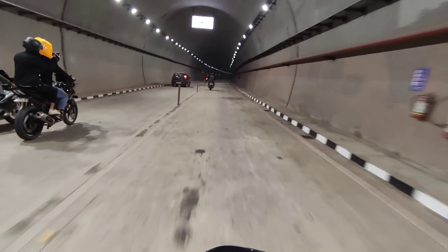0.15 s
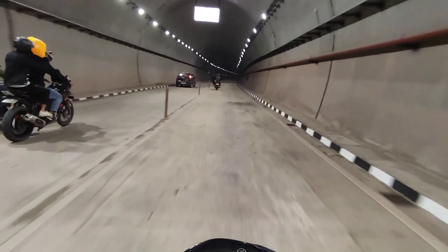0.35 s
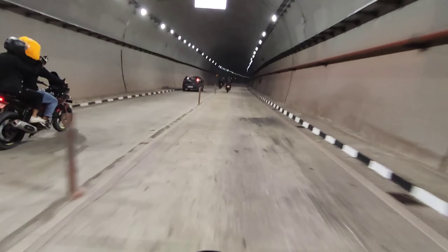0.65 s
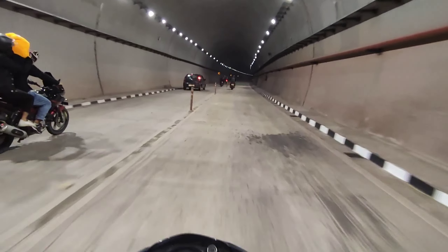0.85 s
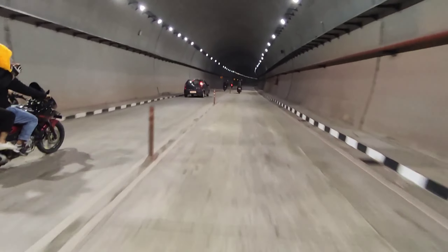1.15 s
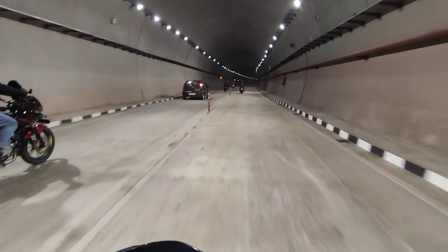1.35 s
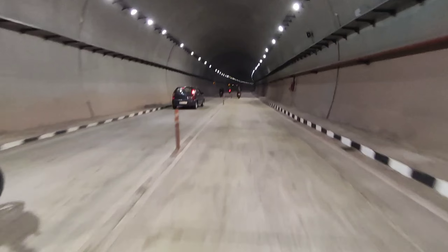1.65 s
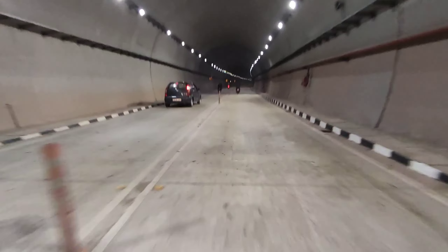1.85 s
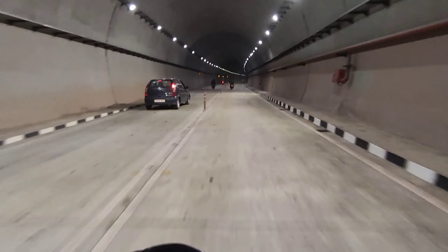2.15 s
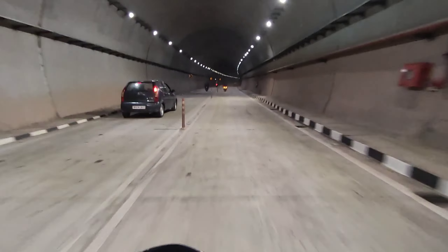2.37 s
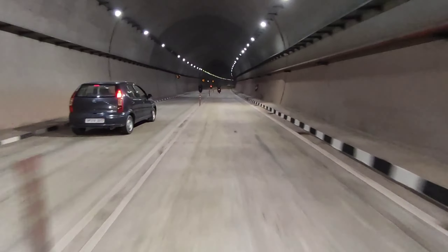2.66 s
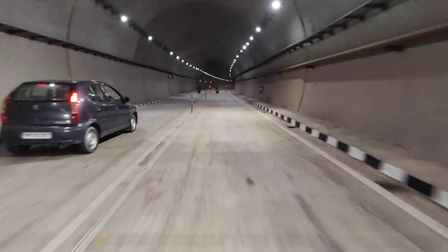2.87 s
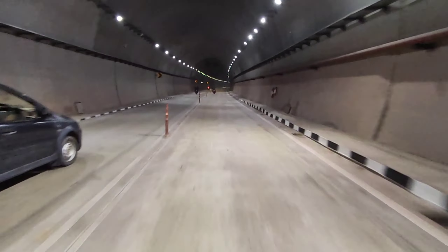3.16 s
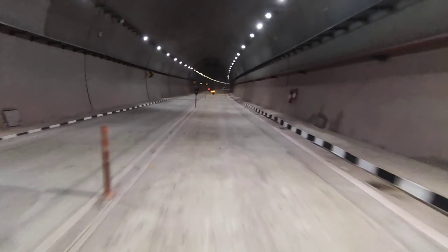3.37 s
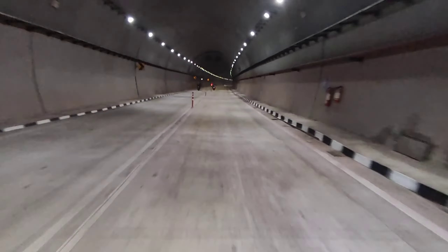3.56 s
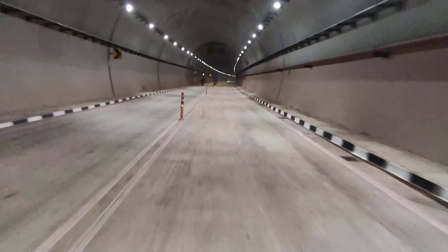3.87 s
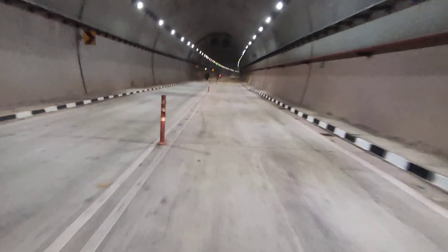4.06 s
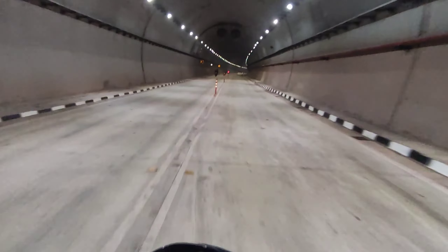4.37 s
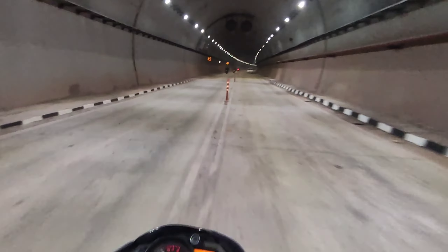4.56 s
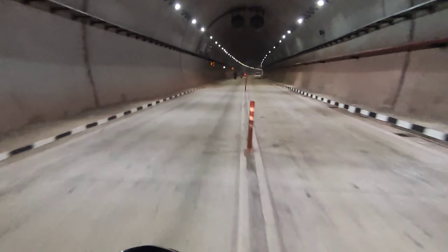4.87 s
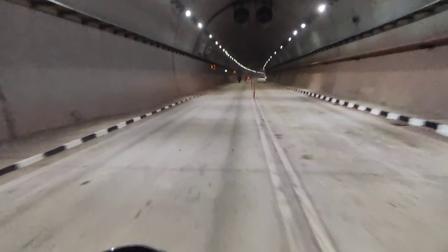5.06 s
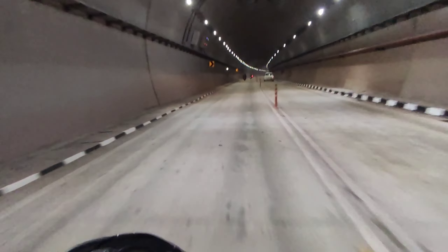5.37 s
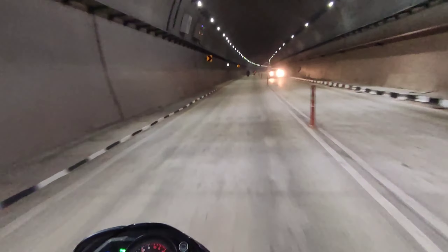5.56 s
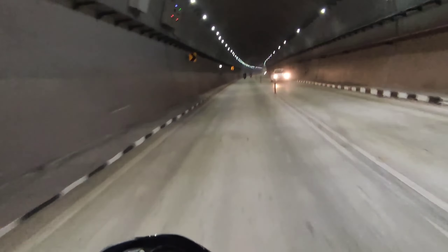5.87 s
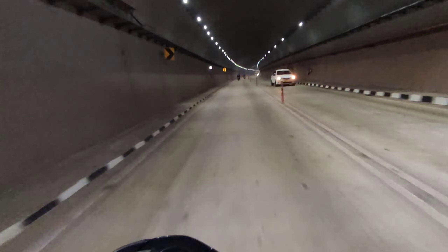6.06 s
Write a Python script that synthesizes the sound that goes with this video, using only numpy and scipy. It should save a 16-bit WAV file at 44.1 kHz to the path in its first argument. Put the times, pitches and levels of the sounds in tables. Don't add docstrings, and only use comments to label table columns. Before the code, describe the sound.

Onboard a motorcycle accelerating through a concrete road tunnel, raspy exhaust drone, sharp backfire pops, a gear change, roaring echoes and buffeting wind.

```python
import sys
import numpy as np
from scipy import signal
from scipy.fft import rfft, irfft, next_fast_len
from scipy.io import wavfile
from scipy.ndimage import uniform_filter1d, minimum_filter1d

SR = 44100
rng = np.random.default_rng(int(sys.argv[2]) if len(sys.argv) > 2 else 0)


def voltage_ratio(level):
    return 10 ** (np.asarray(level, float) / 20)


def wav_out(sig):
    wavfile.write(sys.argv[1], SR, np.round(np.clip(np.atleast_2d(sig).T, -1, 1) * 32767).astype(np.int16))


N = 274302

# t/s, peak level/dB
POP_TIMES = [
    (1.2216, -8.5),
    (1.303, -11.5),
    (1.373, -17),
    (1.3833, -22.5),
    (1.4465, -17),
    (1.5285, -11.5),
    (1.6084, -12.5),
    (5.823, -24.5),
]
DROPOUT_S = .4696


def rms_one(x):
    return x / np.sqrt(np.mean(x ** 2) + 1e-20)


def in_time(rows):
    s, *columns = np.transpose(rows)
    return [np.interp(np.arange(N) / SR, s, c) for c in columns]


def bump(s, half_s):
    return np.exp(-((np.arange(N) / SR - s) / half_s) ** 2)


def drift(rate_hz):
    coarse = 40
    r = np.exp(-2 * coarse * np.pi * rate_hz / SR)
    slow = signal.lfilter([1], [1, -2 * r, r * r], rng.standard_normal(N // coarse + 2002))[2000:]
    return np.interp(np.arange(N) / coarse, np.arange(len(slow)), rms_one(slow - slow.mean()))


def noise_bands(spectrum, patchy_db, patch_rate):
    hz, level_db = np.transpose(spectrum)
    edges = np.geomspace(hz[0], hz[-1], int(4 * np.log2(hz[-1] / hz[0])) + 1)
    run_in = SR // 2
    white = rng.standard_normal((2, N + run_in))
    for k, (low, high) in enumerate(zip(edges, edges[1:])):
        band_pass = signal.butter(3, [low, high], "band", fs=SR, output="sos")
        band = signal.sosfilt(band_pass, white[k % 2])[run_in:]
        centre = np.sqrt(low * high)
        band_db = np.interp(np.log(centre), np.log(hz), level_db)
        yield centre, band * voltage_ratio(band_db + patchy_db * drift(patch_rate))


def order(turns, multiple, level_db, fading_db):
    scatter = 2 * np.pi if multiple < 8 else 3.8
    wander = 0.41 * drift(6.5) + scatter * rng.random()
    gain = voltage_ratio(level_db + fading_db * drift(8.1))
    return np.sqrt(2) * gain * np.sin(2 * np.pi * multiple * turns + wander)


def exhaust(turns, load_db):
    # multiple of the firing rate, level/dB
    strong_orders = [(1, -27), (2, -25.5), (3, -25), (4, -30), (5, -26), (6, -29.5), (7, -32), (8, -32),
                     (9, -33.5), (10, -33)]
    # multiple, level against the mean load/dB
    weak_orders = [(11, -3.5), (12, -9), (13, -10.5), (14, -22.5), (15, -17), (16, -13.5), (17, -16),
                   (18, -16.5)]
    # t/s, multiple, half length/s, swell/dB
    order_swells = [(0.047, 1, 0.11, 11), (0.205, 4, .15, 8), (3.1, 2, .1, 8), (3.977, 1, 0.07, 9.5),
                    (4.45, 1, .12, 5), (1.5, 3, .13, 6), (0.972, 2, 0.19, 12), (1.7, 2, .25, 8.5),
                    (2.272, 2, .15, 9.5), (2.597, 2, 0.087, 5.5), (3.57, 2, .1, 8), (5.2, 2, .1, 6),
                    (0.331, 3, .3, 8.5), (1.071, 3, 0.13, 2), (1.779, 3, .1, 11), (2.2, 3, .22, 9.5),
                    (2.85, 3, .25, 7), (3.451, 3, .25, 10.5), (4.3, 3, 0.18, 6.5), (5.15, 3, .2, 10),
                    (5.58, 3, .05, 6), (6.12, 3, .15, 4.5), (.45, 5, 0.11, 12), (0.674, 5, 0.091, 12),
                    (1.03, 5, .17, 9), (2.24, 5, 0.13, 10.5), (2.72, 5, .14, 7), (3.489, 5, 0.27, 7.5),
                    (3.84, 5, .06, 7), (4.116, 5, .1, 9),
                    (5.0, 5, 0.17, 9), (5.37, 5, 0.067, 7), (6.14, 5, .14, 10), (0.28, 6, 0.16, 13.5),
                     (0.65, 6, 0.2, 6), (4.18, 8, .2, 7), (2.12, 6, 0.24, 7.5), (2.53, 6, 0.12, 9.5),
                     (3.0, 6, 0.14, 6), (4.58, 5, 0.13, 6.5), (4.6, 6, 0.27, 7.5), (5.6, 6, 0.076, 4),
                     (.67, 7, 0.052, 6.5), (1.14, 7, 0.3, 12), (2.197, 7, 0.15, 6.5), (3.52, 7, 0.27, 11.5),
                     (3.93, 7, .08, 10.5), (4.9496, 7, 0.11, 13), (5.57, 7, 0.067, 11), (.62, 9, 0.11, 7),
                     (4.403, 9, 0.13, 12.5), (4.75, 9, .15, 14), (5.22, 9, .07, 16.5), (1.3, 8, .2, 8),
                     (.64, 10, 0.1, 10), (2.5, 10, 0.32, 7.5), (3.576, 10, 0.07, 17.5),
                     (3.91, 10, 0.18, 8.5), (4.44, 10, 0.26, 6.5), (5.27, 10, 0.25, 5.5)]
    level_db = {round(k): load_db + db for k, db in strong_orders}
    for s, k, half_s, swell_db in order_swells:
        level_db[round(k)] = level_db[round(k)] + swell_db * bump(s, half_s)
    mean_db = np.mean(list(level_db.values())[2:], axis=0)
    strong = sum(order(turns, k, db, fading_db=1.25) for k, db in level_db.items())
    weak = sum(order(turns, round(k), mean_db + db, fading_db=2.0) for k, db in weak_orders)
    rasp = sum(order(turns, k, mean_db - 23.0 - 0.38 * (k - 19), fading_db=4.5) for k in range(19, 30))
    return strong + weak + rasp


def neighbour():
    # t/s, firing rate f/Hz, level/dB
    bike_course = [
        (0, 51, -22.5),
        (.4, 47.7, -17.5),
        (.8, 50.5, -16.5),
        (1.1, 48, -22),
        (1.4, 50, -19),
        (1.8, 49.5, -38.5),
        (6.22, 53, -67),
    ]
    # multiple of the firing rate, level/dB
    bike_orders = [(1, -8.5), (2, -2.5), (3, -10), (5, -8), (6, -9), (8, -13.5)]
    rate, level_db = in_time(bike_course)
    turns = np.cumsum(rate * (1 + 0.0037 * drift(5.5))) / SR
    lines = 0
    for k, db in bike_orders:
        phase = 2 * np.pi * (round(k) * turns + rng.random())
        lines = lines + voltage_ratio(db + 2.9 * drift(6.9)) * np.sin(phase)
    return np.sqrt(2) * voltage_ratio(level_db) * lines


def tunnel(x):
    t60_s, wall_cut_hz = 1.35, 2200
    size = next_fast_len(N + 2 * SR)
    w = 2 * np.pi * np.arange(size // 2 + 1) / size
    dull = 1 / (1 + 1j * w * SR / (2 * np.pi * wall_cut_hz))
    echoes = 0
    for k, lag in enumerate(rng.uniform(.025, .07, size=8) * SR):
        one_round = voltage_ratio(-60 * lag / SR / t60_s) * dull * np.exp(-1j * w * lag)
        echoes = echoes + (-1) ** k * one_round / (1 - one_round)
    return irfft(rfft(x, size) * echoes / np.sqrt(8), size)[:N]


def roar(turns):
    # t/s, hiss level/dB
    traffic_course = [(0, -45.5), (.19, -39.5), (.4, -37), (.9, -36), (1.05, -35.5), (1.42, -34.5),
                      (1.57, -34.5), (1.78, -40.5), (2.18, -39.5), (2.75, -42.5), (3.25, -45.5),
                      (3.55, -40), (4.16, -42.5), (4.55, -40.5), (5.2, -37), (5.6, -37), (5.85, -39.5),
                      (6.22, -41.5)]
    # f/Hz, density level/dB
    boom_colour = [(60, -7), (75, -1.5), (165, 0.5), (210, -2.5), (290, -0.7), (420, -6), (560, -4.5),
                   (650, -5.5), (730, -16), (900, -22.5)]
    # f/Hz, density level/dB
    hiss_colour = [(800, 0), (1050, -7.5), (1700, -6), (2050, -12.5), (2500, -16.5), (3200, -19.5),
                   (4000, -18), (4700, -30.5), (5500, -38), (6500, -43.5), (7400, -41.5), (8000, -50)]
    hiss_db, = in_time(traffic_course)
    swing_db = hiss_db + 40
    boom = sum(band for hz, band in noise_bands(boom_colour, patchy_db=1.05, patch_rate=19.0))
    boom = voltage_ratio(-16.5 + 0.53 * swing_db) * rms_one(boom)
    upper = np.zeros((3, N))
    for hz, band in noise_bands(hiss_colour, patchy_db=0.8, patch_rate=9.8):
        upper[int(hz > 2300) + int(hz > 4700)] += band
    bark = voltage_ratio(-28.5 + 0.86 * swing_db) * rms_one(upper[0])
    hiss = signal.sosfilt(signal.butter(8, 4670, fs=SR, output="sos"), upper[1])
    hiss = voltage_ratio(-40.0 + 0.96 * swing_db) * rms_one(hiss)
    air = voltage_ratio(-55.5 + 0.93 * swing_db) * rms_one(upper[2])
    throb = 1 + .1 * np.cos(2 * np.pi * turns + .7 * drift(2.5))
    flicker = voltage_ratio(0.25 * drift(25.0))
    return boom + throb * ignition_cuts() * flicker * (bark + hiss + air)


def wind():
    # f/Hz, density level/dB
    wind_colour = [(10, 0), (18, 3), (30, -2.5), (45, 3.5), (62, 0), (95, -10)]
    # t/s, thump rise/dB, rumble rise/dB
    gust_list = [(.15, 4, 4), (.36, 7.5, 6), (.6, 4.5, 4), (1.02, -6, 9), (1.12, 11, -3), (1.39, 0, 11),
                 (1.5, 12, 4), (1.6, 1.5, 8), (2.04, 7.5, 9), (2.26, 11, 10), (2.7, 5.5, -1), (2.95, 6, 1),
                 (3.15, 9, 8.5), (3.5, 6, -1.5), (3.67, 8.5, 7.5), (3.83, 4, -5), (4.05, 12, 8),
                 (4.36, 6, 14), (4.55, 6, 5), (4.77, 16, 9), (5.0, 11.5, 12), (5.29, 9, 6),
                 (5.53, 11.5, -1), (5.75, 7.5, 5), (5.95, 2, 11), (6.12, 5, 6)]
    lumps = np.zeros((2, N))
    for hz, band in noise_bands(wind_colour, patchy_db=-4.0, patch_rate=7.3):
        lumps[int(hz > 42)] += band
    thump_db = -29 + sum(db * bump(s, half_s=0.069) for s, db, _ in gust_list)
    rumble_db = -28 + sum(db * bump(s, half_s=0.079) for s, _, db in gust_list)
    return voltage_ratio(thump_db) * rms_one(lumps[0]) + voltage_ratio(rumble_db) * rms_one(lumps[1])


def ticks():
    # t/s, peak level/dB
    tick_list = [(0.1276, -58), (0.4232, -52), (0.4302, -39.5), (0.4703, -18), (0.6101, -55), (0.8001, -54),
                 (1.0834, -57), (1.1288, -47), (1.2251, -53), (1.3526, -46), (1.386, -41), (1.6092, -44.5),
                 (2.151, -60), (2.165, -42), (2.2494, -56), (2.2687, -50), (2.2884, -48), (2.3066, -49),
                 (3.5513, -41.5), (5.3672, -46)]
    clicks = np.zeros(N)
    for s, peak_db in tick_list:
        if abs(s - DROPOUT_S) > .002:
            clicks[round(s * SR) + np.array([0, 14])] = voltage_ratio(peak_db + 11.0) * np.array([1, -.8])
    return signal.sosfilt(signal.butter(2, [4200, 12000], "band", fs=SR, output="sos"), clicks)


def dropout(x):
    t = np.arange(N) / SR - DROPOUT_S
    near = np.sin(np.pi / 2 * np.clip(1.4 - np.abs(t) / 1e-3, 0, 1)) ** 2
    crest, trough = .7, -.35
    level = np.where(t < 0, crest, trough * (t > 1.6e-4))
    return x * (1 - near) + near * level


def ignition_cuts():
    t = np.arange(N) / SR
    sag = sum(np.exp(-((t - s + 0.037) / 0.0053) ** 2) for s, peak_db in POP_TIMES[:-1])
    return voltage_ratio(-3.0 * sag)


def pops():
    crack, thud, t = np.zeros(N), np.zeros(N), np.arange(SR // 8) / SR
    burst = np.exp(-t / 0.00077)
    echo = (t > .009) * np.exp(-(t - .009) / 0.0033)
    tail = np.exp(-t / 0.035)
    ring = np.exp(-t / 0.012) * np.sin(2 * np.pi * 125 * t)
    for s, peak_db in POP_TIMES:
        at = round(s * SR)
        crack[at:at + len(t)] += voltage_ratio(peak_db - 10.0) * (burst + .5 * echo + 0.21 * tail)
        thud[at:at + len(t)] += voltage_ratio(peak_db + 3.5) * ring
    bright = signal.butter(2, [900, 4300], "band", fs=SR, output="sos")
    noise = signal.sosfilt(bright, rng.standard_normal(N))
    noise = signal.sosfilt(signal.butter(2, 4600, fs=SR, output="sos"), noise)
    return crack * rms_one(noise) + thud


def scene():
    # t/s, firing rate f/Hz, load/dB
    engine_course = [(0, 53.4, 1), (.4, 54.4, 1.5), (.8, 59, 0), (1.07, 57.8, 1), (1.3, 63, 0),
                     (1.5, 59, -3.5), (1.75, 58.2, 0), (1.88, 60, -1.5), (1.93, 50, 2.5), (2.3, 52.5, 4),
                     (3.1, 52.1, -2), (3.6, 54.9, 0), (4.25, 56.8, 0), (4.7, 59.6, 0), (5.3, 60.7, -2),
                     (5.88, 62.2, -1.5), (5.93, 52.6, 2.5), (6.22, 52.3, 4)]
    rate, load_db = in_time(engine_course)
    turns = np.cumsum(rate) / SR
    bikes = exhaust(turns, load_db) + neighbour() + pops()
    return (bikes + voltage_ratio(-11.5) * tunnel(bikes) + roar(turns) + wind())[None]


def roll_off(x):
    return signal.sosfilt(signal.butter(12, 15700, fs=SR, output="sos"), x)


def record(dry):
    top_cut = signal.cheby2(8, 45, 1.147 * 7360, fs=SR, output="sos")
    dull = signal.sosfilt(top_cut, dry)
    crest = -minimum_filter1d(-np.abs(dull), size=301)
    gain = np.minimum(1, (.79 / (crest + 1e-9)) ** .62)
    gain = uniform_filter1d(uniform_filter1d(gain, size=151), size=151)
    flat = np.clip(dull * gain + ticks(), -1, 1)
    self_noise = voltage_ratio(-92.5) * rng.standard_normal(N)
    mix = dropout(flat) + self_noise
    mix = signal.sosfilt(signal.butter(6, 15500, fs=SR, output="sos"), mix)
    mix = mix * np.clip((N - np.arange(N)) / 60, .55, 1)
    return roll_off(mix)


dry = scene()
out = record(dry)
wav_out(out)
```